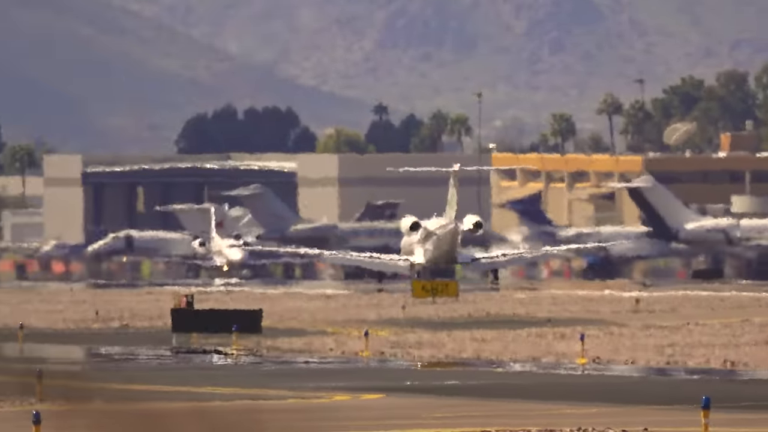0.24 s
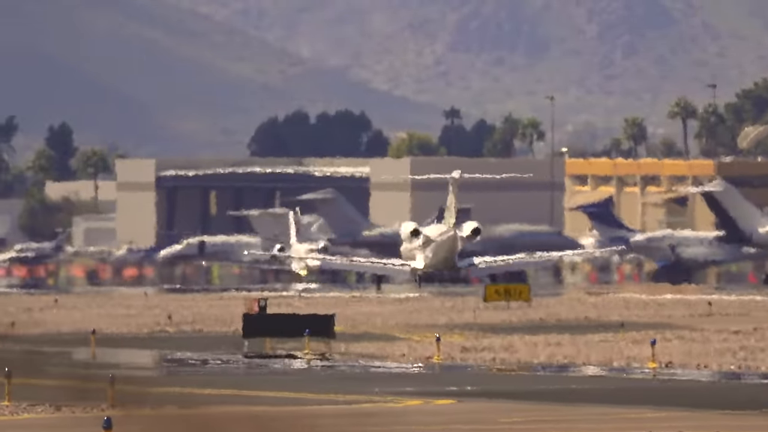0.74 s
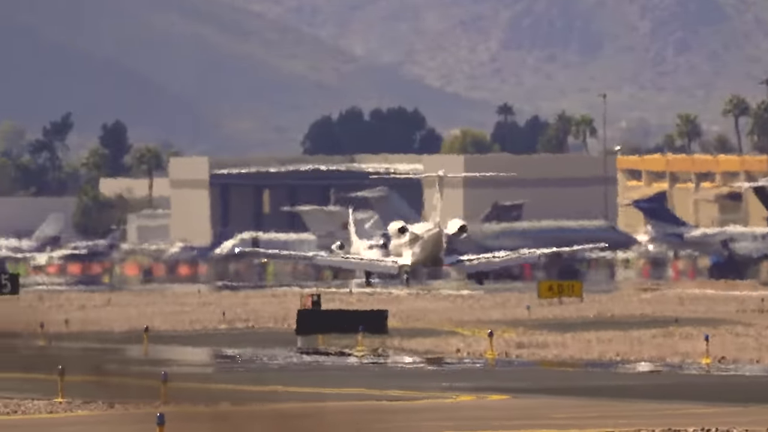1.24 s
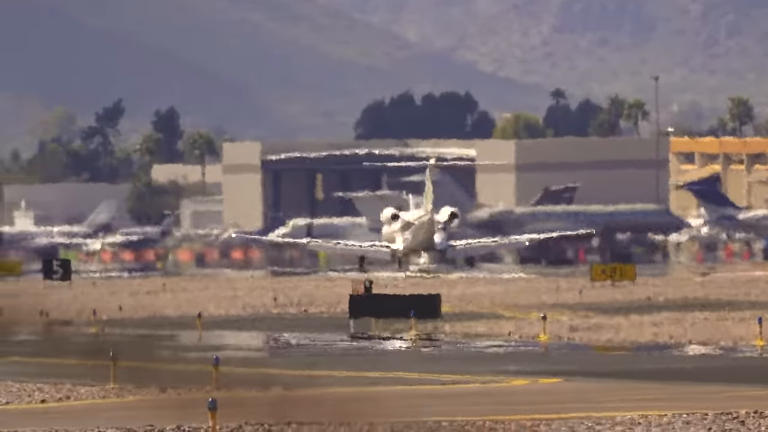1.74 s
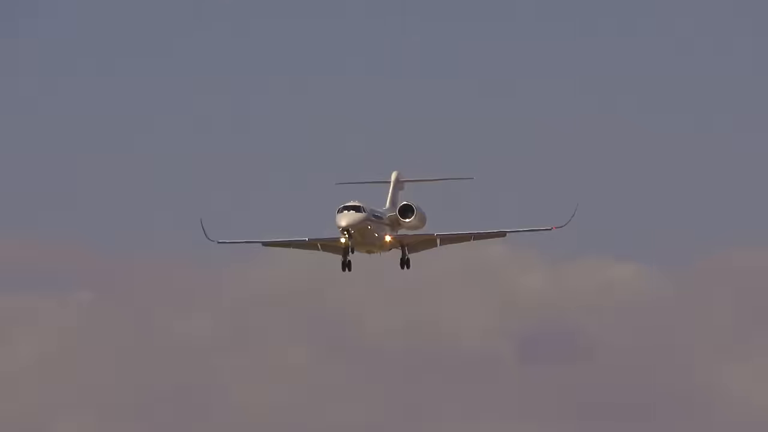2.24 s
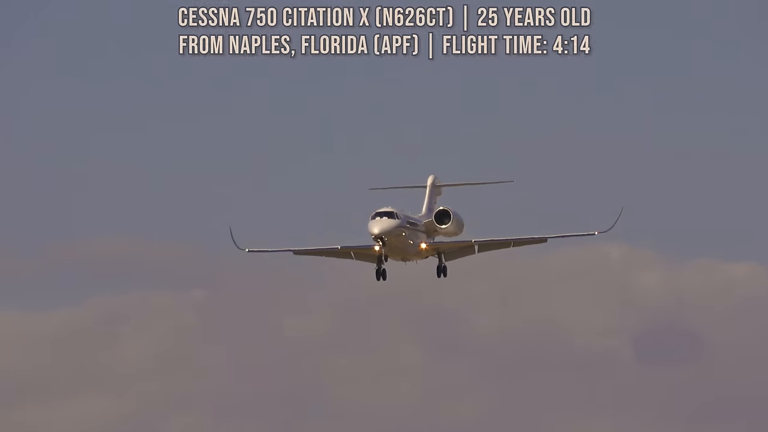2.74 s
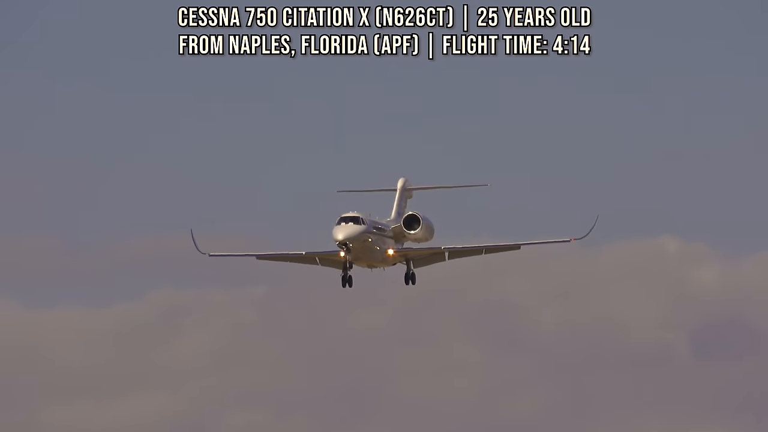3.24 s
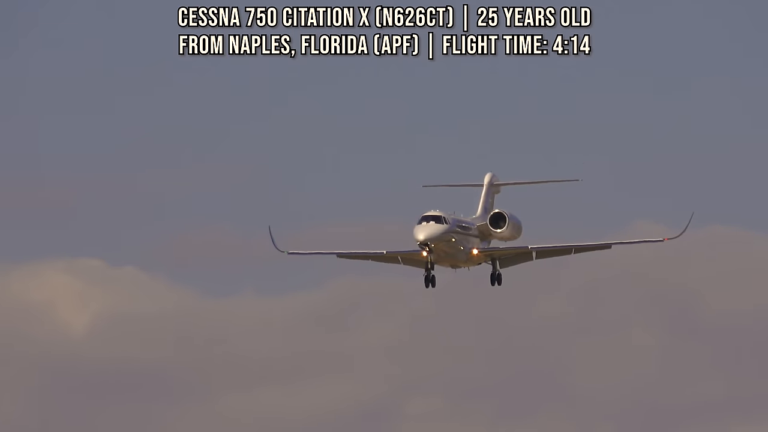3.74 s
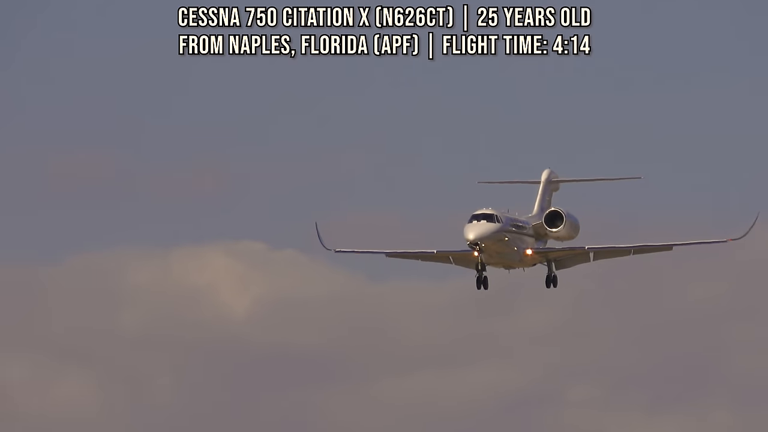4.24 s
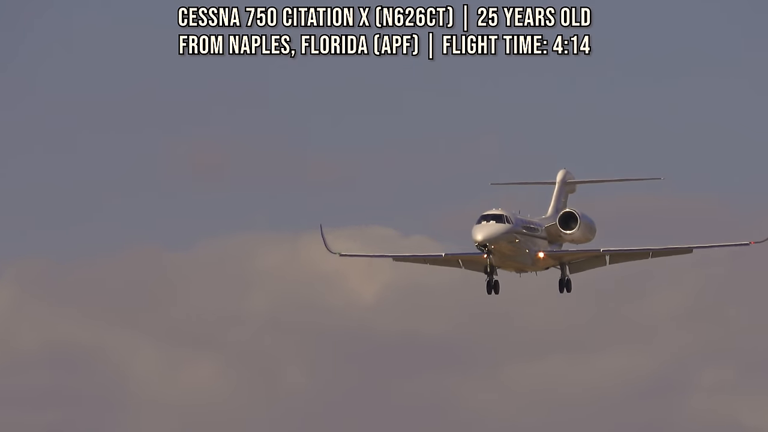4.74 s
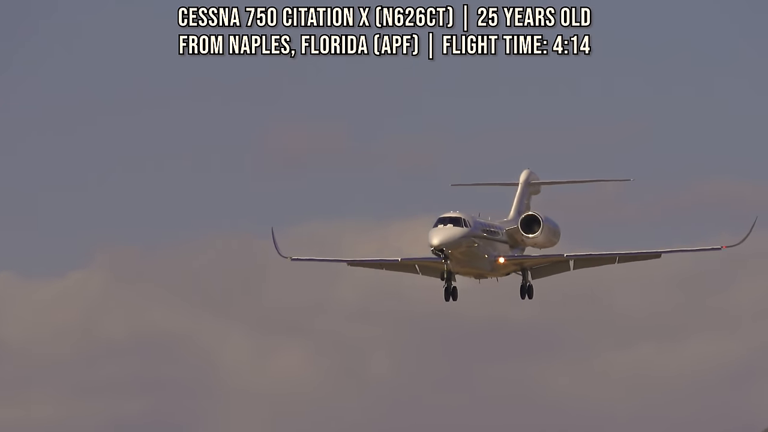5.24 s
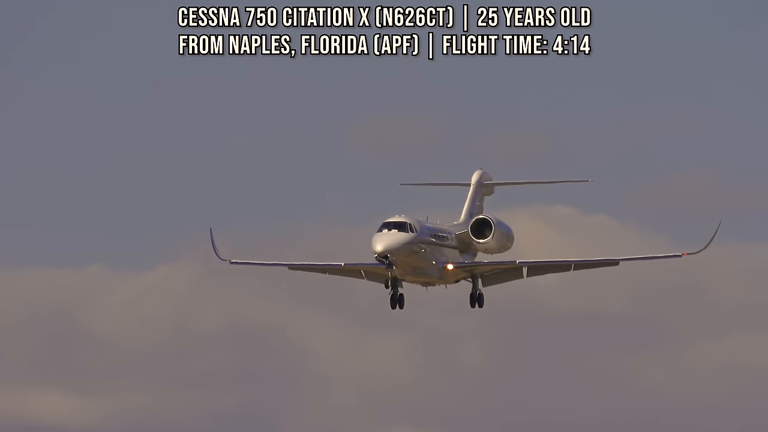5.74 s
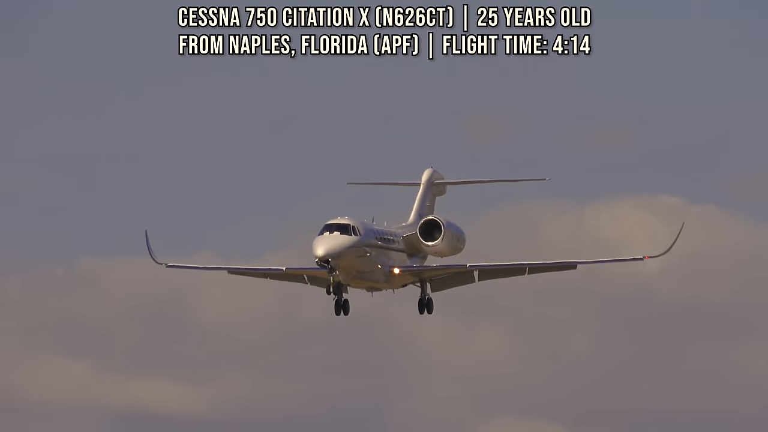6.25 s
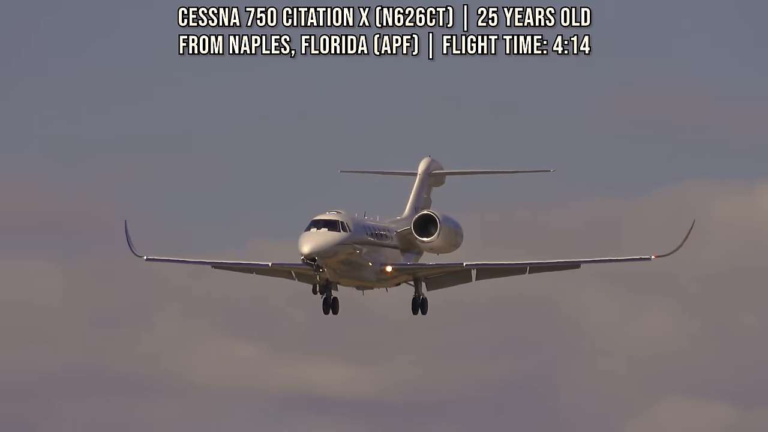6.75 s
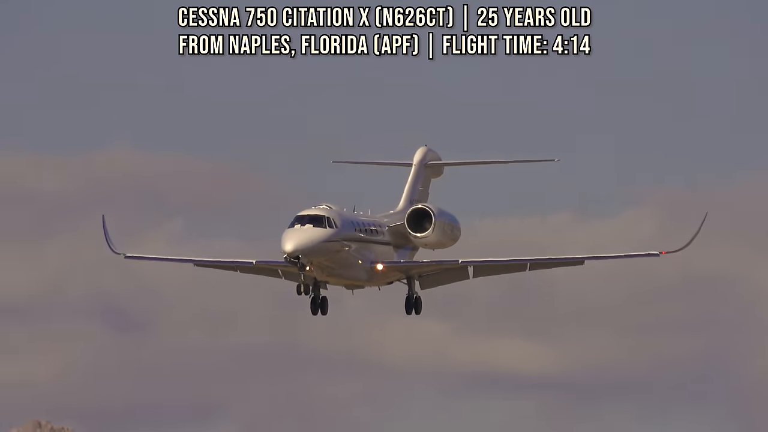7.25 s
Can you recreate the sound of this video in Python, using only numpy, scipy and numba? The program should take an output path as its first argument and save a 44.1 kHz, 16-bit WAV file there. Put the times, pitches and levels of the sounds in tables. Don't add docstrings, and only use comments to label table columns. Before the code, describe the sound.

A stereo microphone beside a runway first picks up far engines, a dark rumble with low tonal hum mostly on the left. The scene blends into a small jet coming nearer, fuller and brighter, with a steady low drone under rushing turbulent noise. Its roar slowly grows, flutters and shifts sideways, with piercing turbine whines breaking through in spells and faint limiter clicks. It is still roaring at the end.

```python
import sys
import numpy as np
from scipy import signal
from scipy.io import wavfile
from scipy.ndimage import uniform_filter1d, map_coordinates
from numba import njit

SR = 44100
rng = np.random.default_rng(int(sys.argv[2]) if len(sys.argv) > 2 else 0)


def undo_db(level):
    steps = np.asarray(level, float) / 20
    return 10 ** steps


def file_out(sig):
    cols = np.atleast_2d(sig).T
    lim = np.clip(cols, -1, 1)
    pcm = np.round(lim * 32767).astype(np.int16)
    wavfile.write(sys.argv[1], SR, pcm)


N = 330750
FADE_S, FADE_LEN_S = 1.56, 0.92

# (frequency [Hz], left minus right [dB])
APRON_LEAN = [(60, -4.5), (100, 0.5), (170, -4.5), (280, 8.5), (470, 8), (800, 8), (1340, 7.0), (2240, 9),
              (3760, 11), (6300, 15.5)]


def unit(x):
    return x / np.sqrt(np.mean(np.abs(x) ** 2) + 1e-20)


def along(points, hz):
    f, v = np.transpose(points)
    return np.interp(np.log(hz + 1), np.log(f + 1), v)


def bell(x, mid, half, power=2):
    return np.exp(-np.abs((x - mid) / half) ** power)


def humps(peaks, hz):
    return sum(db * bell(hz, mid, width) for mid, width, db in peaks)[:, None]


def wobble(rate):
    coarse = np.arange(0, N + 64, 64)
    knots = rng.standard_normal(int(N * rate / SR) + 4)
    curve = map_coordinates(knots, [coarse * rate / SR])
    return np.interp(np.arange(N), coarse, curve)


def sides(pan_db):
    left = 2 / (1 + undo_db(-pan_db))
    return np.array([left, 2 - left])


def patches(shape, tall, long):
    field = uniform_filter1d(rng.standard_normal(shape), size=tall, axis=0)
    field = uniform_filter1d(field, size=long, axis=1)
    return unit(uniform_filter1d(field, size=long, axis=1))


def rush(spectrum, steer, patchy_db, wander_db, apart_db):
    frame = 1024
    hz, t, z = signal.stft(rng.standard_normal((2, N)), SR, nperseg=frame)
    z = z * undo_db(along(spectrum, hz))[:, None]
    z = z / np.sqrt(np.mean(signal.istft(z[0], nperseg=frame)[1] ** 2))
    gain_db, pan_db = steer(hz, t)
    gain = undo_db(gain_db + patchy_db * patches(z[0].shape, tall=10, long=5))
    pan = sides(pan_db + wander_db * patches(z[0].shape, tall=8, long=12))
    opposite = np.array([1, -1])[:, None, None]
    apart = undo_db(along(apart_db, hz))[:, None] * z[1] * opposite
    return signal.istft(gain * (pan * z[0] + apart), nperseg=frame)[1][:, :N]


def tone(hz, smear_hz, rough):
    phase = 2 * np.pi * (hz * np.arange(N) / SR + rng.random())
    steady = (1 + rough * wobble(smear_hz)) * np.cos(phase)
    scattered = rough * wobble(smear_hz) * np.sin(phase)
    return unit(steady + scattered)


def faded(t):
    return np.clip((t - FADE_S) / FADE_LEN_S, 0, 1)


def apron_air():
    # (frequency [Hz], density [dB per Hz])
    air_colour = [(25, -28), (45, -32), (58, 0.5), (120, -0.5), (200, -5.5), (320, -15.5), (450, -14),
                  (600, -17.5), (1000, -22.5), (1500, -27), (3000, -38.5), (4200, -37.5), (8000, -50.5),
                  (15700, -71.5)]
    # (frequency [Hz], width [Hz], lift [dB])
    air_humps = [(10300, 530, 7), (12000, 1500, 4), (2500, 340, 1.5), (316, 109, 7.5)]

    def steer(hz, t):
        bass_share = along([(150, 0.95), (250, 0.047)], hz)[:, None]
        bass_db = 1.5 - 1.5 * np.minimum(t, FADE_S)
        gain_db = humps(air_humps, hz) + bass_share * bass_db
        return gain_db, along(APRON_LEAN, hz)[:, None]

    apart_db = [(100, -35.5), (3000, -28), (10000, -15.5)]
    return undo_db(-24.5) * rush(air_colour, steer, patchy_db=0.5, wander_db=0.5, apart_db=apart_db)


def idling_turbine():
    idle_hz = [58.5, 118, 282.5, 424.4, 495.5, 8258, 10415, 10190]
    # (level [dB], smear [Hz], roughness [0-2])
    idle_tones = [(-33, 4, 1.6), (-29.5, 4, 1.5), (-30, 2.6, 0.092), (-38.5, 2.7, 0.18), (-44, 0.95, 0.14),
                  (-80, 60, 2), (-70, 90, 1.4), (-84, 80, 2)]
    idle = np.zeros((2, N))
    for hz, (db, smear_hz, rough) in zip(idle_hz, idle_tones):
        lean = sides(along(APRON_LEAN, hz))[:, None]
        idle += undo_db(db) * lean * tone(hz, smear_hz, rough)
    return idle


def apron():
    fade_out = (1 - faded(np.arange(N) / SR)) ** 0.55
    return fade_out * (apron_air() + idling_turbine())


def preamp_hiss():
    # (frequency [Hz], density [dB per Hz])
    hiss_colour = [(20, -31.5), (7000, -11.5), (10000, -2), (15700, -7)]
    apart_db = [(8000, -3.0), (12000, -6.5)]
    return undo_db(-73.5) * rush(hiss_colour, lambda hz, t: (0, 0), patchy_db=3.5, wander_db=0.0, apart_db=apart_db)


def surging(t):
    # (time [s], half length [s], lift [dB])
    surges = [
        (2.396, .08, 2.5),
        (2.68, .25, 1.5),
        (3.294, 0.12, -2.5),
        (3.804, 0.17, 2.5),
        (5.952, .15, 5),
        (6.7, .1, 4.5),
    ]
    return sum(db * bell(t, s, half) for s, half, db in surges)


def rotor_hum():
    order_db = [-21.5, -17.5, -26.5, -41.5]
    t = np.arange(N) / SR
    turns = 83.14 * t
    hum = np.zeros(N)
    for order, db in enumerate(order_db, start=1):
        level_db = db + 0.28 * surging(t) + 0.65 * wobble(3)
        hum += undo_db(level_db) * np.cos(2 * np.pi * order * turns)
    return np.sqrt(2) * hum * sides(-0.3 + 0.8 * wobble(3.6))


def exhaust_rumble():
    # (frequency [Hz], density [dB per Hz])
    rumble_colour = [(20, -40), (40, -42), (55, -21), (75, -7), (124, 2), (162, -7), (211, -7.5), (259, -7),
                     (320, -14), (379, -34), (450, -42.5), (900, -95)]

    def steer(hz, t):
        surge_share = along([(130, 1.1), (220, 0.37)], hz)[:, None]
        return surge_share * surging(t), -0.4

    apart_db = [(60, -39.5), (400, -16.5)]
    return undo_db(-17.5) * rush(rumble_colour, steer, patchy_db=1.15, wander_db=1.5, apart_db=apart_db)


def jet_roar():
    # (frequency [Hz], density [dB per Hz])
    roar_colour = [(300, -32.5), (380, -5.5), (545, -2), (645, 1), (972, -1.5), (1630, -2.5), (2310, -5),
                   (3610, -13), (4220, -16.5), (4880, -21.5), (6750, -31), (8000, -41), (9500, -57.5),
                   (15000, -92.5)]
    # (frequency [Hz], left minus right [dB])
    roar_lean = [(350, 3), (390, -3), (430, -14.5), (500, -8.5), (600, -1), (1000, -1.5), (1200, -0.5),
                 (2200, -1), (8000, 5)]
    # (frequency [Hz], width [Hz], lift [dB])
    roar_humps = [(4230, 340, 2.5), (5300, 360, 5), (6230, 370, 5)]
    # (frequency [Hz], rise [dB per s])
    approach = [(800, 0.47), (2000, 0.5), (6000, 0.75)]
    eddy_s = [1.75, 1.84, 2.05, 2.18, 2.3, 2.85, 3.18, 3.44, 3.98, 4.15, 4.42, 4.9, 4.95, 5.14, 5.28, 5.67,
              5.78, 6.2, 6.66, 6.85, 7.0, 7.18, 7.27]
    # (half length [s], centre [Hz], swell [dB], swing left [dB])
    eddies = [(0.17, 900, 0, 3), (.22, 3900, 0.5, 26), (0.093, 1400, -0.5, 2), (0.18, 6000, 2, 12),
              (.07, 640, 1.5, 2), (.2, 4800, -1.5, 0.5), (0.068, 4000, 5.5, 6), (0.15, 4100, 8, 24.5),
              (0.072, 5600, 1.5, 4.5), (0.27, 2900, 0.5, -12.5), (0.2, 3600, 5, 6), (0.16, 3700, 3.5, -2.5),
              (0.62, 950, 2, -1), (0.089, 6600, 5, 9.5), (0.22, 3600, -0.5, -10), (0.25, 4540, 10, 13),
              (0.24, 1450, 3, 2.5), (0.47, 5300, -4.5, 1), (0.11, 6200, 2.5, 2), (.15, 640, -3, -1),
              (.1, 3500, -2, -3), (0.07, 4000, 5.5, 5), (0.058, 6000, 4.5, 12)]
    # (time [s], frequency [Hz])
    ground_band = [
        (1.6, 2500),
        (1.9, 2000),
        (2.3, 1260),
        (2.7, 1330),
        (3.2, 1750),
        (4.2, 1680),
        (5.6, 2110),
        (6.3, 1620),
        (7.5, 2100),
    ]

    def steer(hz, t):
        octave = np.log2(hz + 1)[:, None]
        swell_db = along(approach, hz)[:, None] * (t - t.mean())
        swing_db = 0
        for s, (half_s, mid_hz, swell, swing) in zip(eddy_s, eddies):
            touch = bell(t, s, half_s, power=2.2) * bell(octave, np.log2(mid_hz), 0.61)
            swell_db = swell_db + swell * touch
            swing_db = swing_db + swing * touch
        ground_s, ground_hz = np.transpose(ground_band)
        echo_hz = np.interp(t, ground_s, ground_hz)
        ground_db = 3.5 * bell(hz[:, None], echo_hz, 260) + bell(hz[:, None], 1.35 * echo_hz, 260)
        base_db = along([(1900, -0.78), (3900, -1.6), (6200, -1.7)], hz)[:, None]
        gain_db = base_db + swell_db + humps(roar_humps, hz) + ground_db
        return gain_db, along(roar_lean, hz)[:, None] + swing_db

    apart_db = [(400, -33), (1000, -36.5), (4500, -35.5), (5500, -5.0), (8000, -2)]
    return undo_db(-27) * rush(roar_colour, steer, patchy_db=0.87, wander_db=4.0, apart_db=apart_db)


def blade_whines():
    blade_hz = [4212.6, 4763.3, 5177.3, 5318.4]
    # (smear [Hz], roughness [0-2], left minus right [dB])
    blades = [(60, 1, 4), (50, .8, 4), (80, .95, -2), (60, .85, 0)]
    # (time [s], half length [s], peak [dB])
    flares = [
        [(2.0, 0.17, -58), (2.6, .35, -54.5), (3.35, .17, -48), (4.4, .13, -47), (5.0, 0.33, -45.5),
         (5.55, 0.19, -44), (6.8, 0.12, -49), (7.15, .25, -51)],
        [(2.3, 0.5, -53.5), (3.8, .2, -60), (4.8, .15, -64), (5.5, .2, -62), (6.3, .2, -59)],
        [(2.0, 0.17, -50), (2.35, .2, -52), (3.4, 0.29, -52), (4.55, .3, -44.5), (5.6, .35, -48.5),
         (6.12, 0.24, -45), (7.25, .5, -49.5)],
        [(2.2, 0.33, -59), (3.6, .2, -59), (4.1, .2, -49), (4.95, .3, -48), (5.8, 0.24, -56),
         (6.6, 0.23, -55.5), (7.2, 0.2, -47)],
    ]
    t = np.arange(N) / SR
    whines = np.zeros((2, N))
    for spells, hz, (smear_hz, rough, pan_db) in zip(flares, blade_hz, blades):
        gain = undo_db(-63) + sum(undo_db(db) * bell(t, s, half) for s, half, db in spells)
        pan = sides(pan_db + 3 * wobble(2))
        whines += undo_db(-3) * gain * pan * tone(hz, smear_hz, rough)
    return whines


def faint_tones():
    faint_hz = [424.4, 495.5, 1235.2, 6160]
    # (level [dB], smear [Hz], roughness [0-2], left minus right [dB])
    faint = [(-46, 3, 0.27, -29.5), (-47, 2.7, 0.61, -16.5), (-45.5, 5.6, .5, -9), (-67.5, 18, .7, 5)]
    tones = np.zeros((2, N))
    for hz, (db, smear_hz, rough, pan_db) in zip(faint_hz, faint):
        gain = undo_db(db + 1.1 * wobble(1.4))
        tones += gain * sides(pan_db)[:, None] * tone(hz, smear_hz, rough)
    return tones


def squeal():
    # (start [s], attack [s], hold [s], release [s], level [dB])
    squeal_shape = (1.95, .25, .38, .18, -67)
    start, attack, hold, release, db = squeal_shape
    corners = start + np.cumsum([0, attack, hold, release])
    shape = np.interp(np.arange(N) / SR, corners, [0, 1, 1, 0])
    return undo_db(db) * shape * sides(3.0)[:, None] * tone(7348, 10, 0.3)


def scene():
    rise = faded(np.arange(N) / SR)
    drone = rotor_hum() + exhaust_rumble()
    jet = jet_roar() + blade_whines() + squeal() + faint_tones()
    return apron() + rise ** 1.05 * drone + np.minimum(2.3 * rise, 1) * jet


def limiter_ticks():
    # (time [s], strength [dB], about 9 dB below the tick's peak)
    catches = [(2.365, -47.5), (2.9604, -51), (3.4271, -52.5), (4.2366, -49.5), (4.574, -50),
               (4.7182, -53.5), (5.0515, -51.5), (5.273, -51.5), (5.3194, -52.5), (5.4162, -51.5),
               (5.5616, -44.5), (5.6328, -42.5), (5.895, -57), (5.9339, -47.5), (6.606, -53.5),
               (6.7277, -52), (7.013, -55.5), (7.287, -50), (7.3564, -50.5)]
    kicks = np.zeros(N)
    s, db = np.transpose(catches)
    kicks[np.round((s + 0.0012) * SR).astype(int)] = -undo_db(db + 20)
    band = signal.butter(1, [4000, 9000], "band", fs=SR, output="sos")
    return signal.sosfilt(band, kicks)


@njit
def limiter_gain(peak, top, catch, release):
    gain, g = np.empty_like(peak), 1.0
    for i in range(len(peak)):
        need = min(1.0, top / (peak[i] + 1e-9))
        g += (need - g) * (catch if need < g else release)
        gain[i] = g
    return gain


def top_cut(x):
    return signal.sosfilt(signal.butter(12, 15760, fs=SR, output="sos"), x)


def record(dry):
    x = dry + preamp_hiss()
    loudest = np.abs(x).max(axis=0)
    gain = limiter_gain(loudest, 0.6, 0.2, 1 / (0.048 * SR))
    return top_cut(x * gain + limiter_ticks())


dry = scene()
out = record(dry)
file_out(out)
```